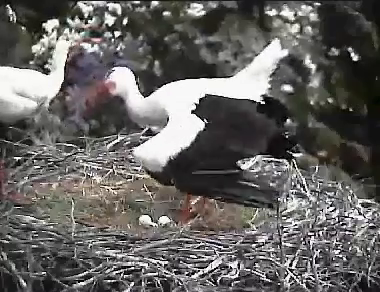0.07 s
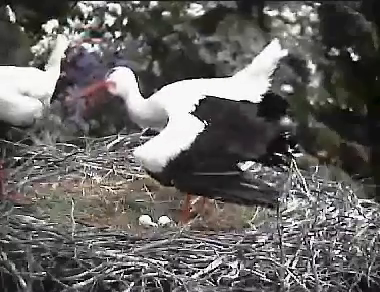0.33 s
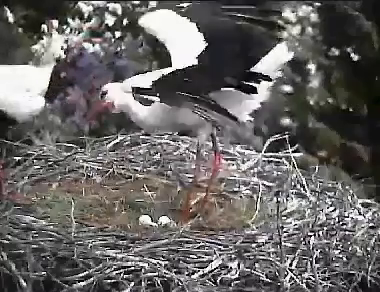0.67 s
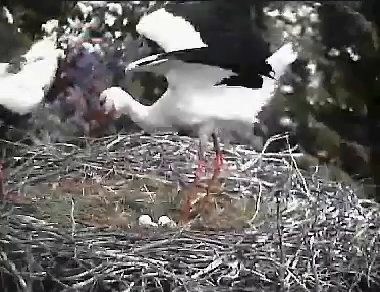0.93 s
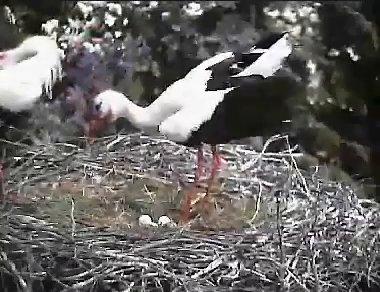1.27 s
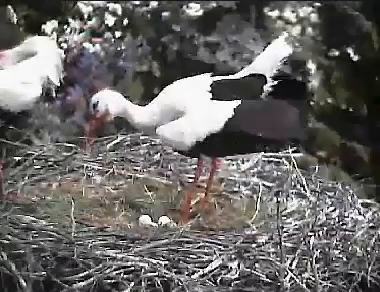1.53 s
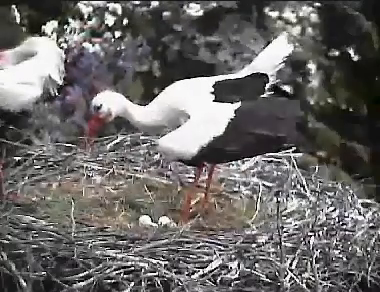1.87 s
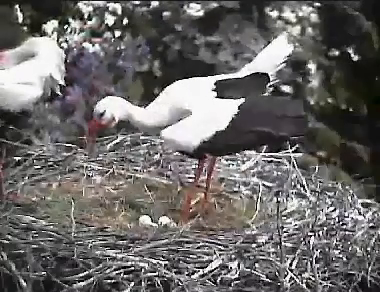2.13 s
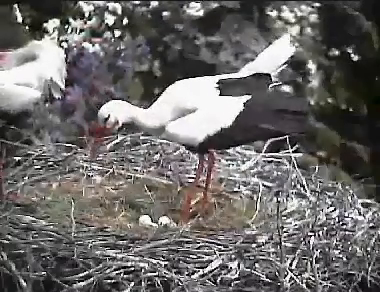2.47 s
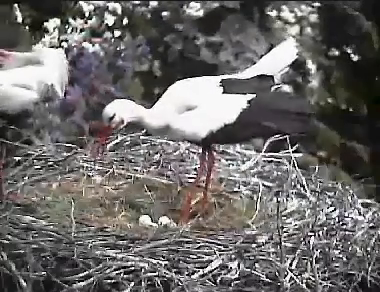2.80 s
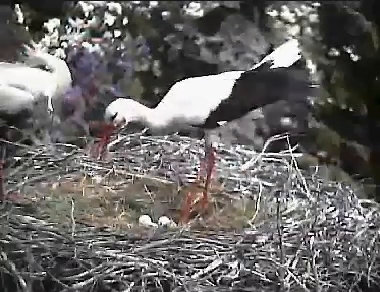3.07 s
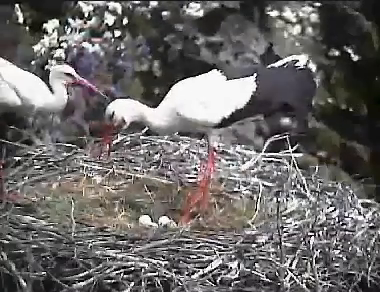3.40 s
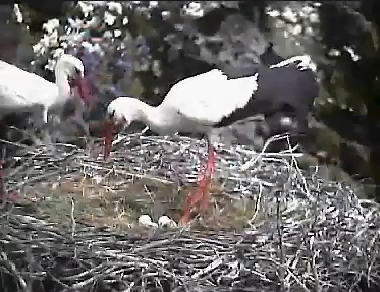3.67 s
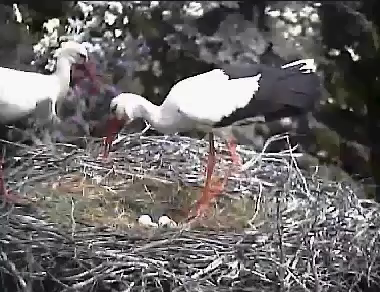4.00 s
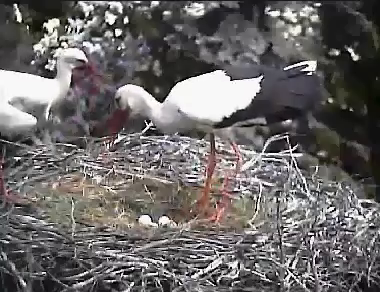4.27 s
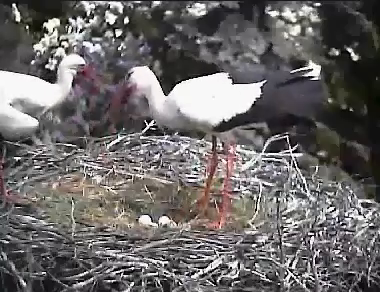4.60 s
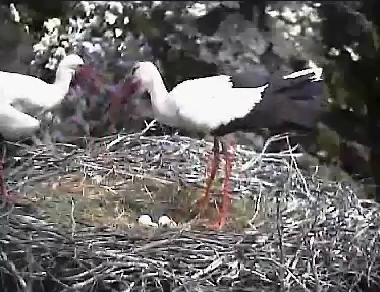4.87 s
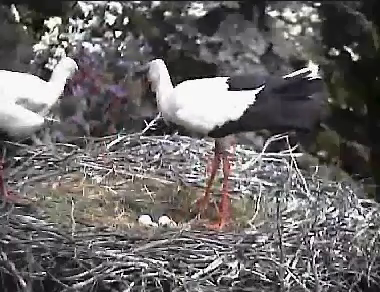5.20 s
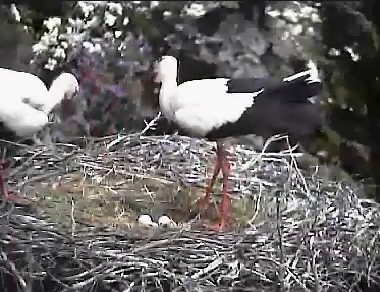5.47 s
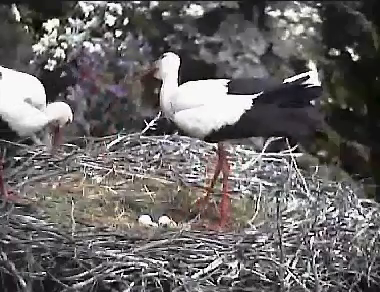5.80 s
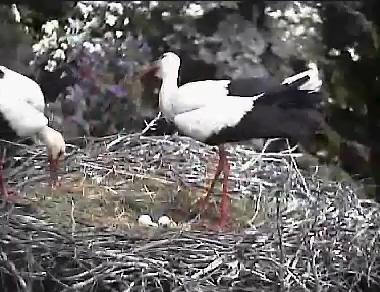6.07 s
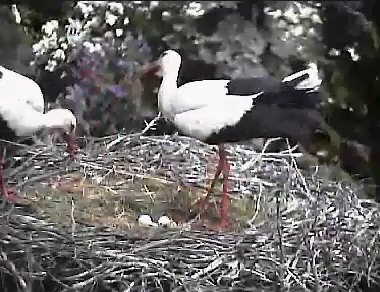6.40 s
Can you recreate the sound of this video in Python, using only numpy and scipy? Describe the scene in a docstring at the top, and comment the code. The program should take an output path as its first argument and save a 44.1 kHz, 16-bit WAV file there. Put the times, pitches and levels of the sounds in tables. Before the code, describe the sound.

Two storks clatter their bills on a twig nest in the open air. One clicks quickly and almost evenly; the other snaps more slowly, then speeds up and turns hollow and muffled before becoming brighter and slower again. Some snaps carry a short, sharp burst of noise. Near the end the clatter thins to a few separate clicks. Twigs rustle faintly, and the microphone at the nest adds a soft, steady hiss.

```python
"""Dry, rapid bill clatter: two white storks greet on their twig nest, each at its own pace.
Every snap rings the horny mandibles and the throat pouch for a few milliseconds; some snaps carry
a loud broadband noise burst. The slower bird speeds up and sounds hollow with its head thrown back.
Twigs rustle faintly, and a nest camera adds steady hiss."""
import sys
import numpy as np
from scipy import signal
from scipy.fft import rfft, irfft, next_fast_len
from scipy.io import wavfile

SR = 44100
rng = np.random.default_rng(int(sys.argv[2]) if len(sys.argv) > 2 else 0)


def store_pcm(level_fs):
    """Save levels as 16-bit WAV."""
    pcm = np.round(np.clip(level_fs, -1, 1) * 32767).astype(np.int16)
    wavfile.write(sys.argv[1], SR, np.atleast_2d(pcm).T)


N = 293265

# Faster bird, near-even beat: start_s, snap_count, force_db, overtone_re_force_db
FAST_RUNS = [(.0908, 1, -38, -8), (.2013, 1, -36.5, -7), (.3161, 2, -34.5, -1.5), (.5535, 1, -34.5, -5.5),
             (.6746, 4, -36.5, -5.5), (1.1451, 2, -36, -3.5), (1.3765, 3, -36, -4.5),
             (1.7321, 2, -38.5, -5.5), (1.9632, 3, -36.5, -4.5), (2.3213, 5, -40.5, -5),
             (2.9136, 3, -41, -5), (3.2745, 2, -40.5, -3.5), (3.5112, 2, -41, -1), (3.7448, 1, -41, -6.5),
             (3.864, 2, -39.5, -3.5), (4.1038, 3, -41, -0.5), (4.4493, 4, -38.5, 0.5),
             (4.9108, 4, -37.5, -1), (5.3745, 1, -37.5, -1.5), (5.4858, 4, -38, -1.5),
             (5.9347, 1, -41.5, -4.5), (6.0507, 1, -51, -6)]
# Slower bird, pitch drops with the head back: start_s, snap_count, force_db, mandible_hz
SLOW_RUNS = [(.0329, 1, -29, 2200), (.1743, 1, -29, 2170), (.3137, 1, -31, 2145), (.4482, 1, -30.5, 2154),
             (.5749, 1, -32, 2100), (.6848, 1, -35, 2144), (.789, 1, -32, 1870), (.8837, 1, -41, 1950),
             (.9624, 1, -40, 1890), (1.0529, 3, -35, 1620), (1.3202, 3, -33, 1610), (1.5923, 2, -32, 1580),
             (1.7785, 2, -34.5, 1670), (1.9688, 2, -34, 1650), (2.169, 3, -34, 1670), (2.477, 2, -35, 1695),
             (2.693, 2, -39, 1720), (2.9321, 1, -36, 1670), (3.0645, 1, -42, 1960), (3.2036, 1, -38, 1976),
             (3.3436, 1, -36, 2330), (3.4866, 1, -39, 2180), (3.6314, 1, -35, 2150),
             (3.7799, 2, -36.5, 2415), (4.0734, 2, -31, 2444), (4.366, 3, -31.2, 2450),
             (4.8074, 1, -31, 2380), (4.9578, 1, -30.5, 2347), (5.112, 2, -34.5, 2360),
             (5.4126, 1, -40, 2330), (6.1897, 1, -64, 1720), (6.3324, 2, -34, 2210), (6.6355, 1, -30, 2227)]
# Upper bill modes: ratio_to_mandible, level_db, decay_s
FAST_BILL_MODES = [(1.25, 1.2, 0.00075), (1.67, 0.5, 0.00042), (1.96, -5.5, 0.00027), (2.33, -11, 0.0013),
                   (3.2, -21.5, 0.00035)]
SLOW_BILL_MODES = [(1.428, 6, 0.00061), (1.743, -5, .0009), (2.05, -11, 0.00052), (2.532, -12, 0.0012),
                   (3.15, -14.5, 0.0014), (3.5, -24.5, 0.0022)]
# Snaps with a loud broadband noise burst: time_s, burst_db
NOISY_SNAPS = [(.435, -40.5), (.575, -54), (.79, -41), (.884, -50.5), (.909, -42), (1.027, -47.5),
               (1.145, -54), (2.44, -48.5), (2.913, -47), (3.344, -48.5), (3.487, -44), (3.511, -48.5),
               (3.927, -41), (4.366, -48.5), (4.66, -45), (4.795, -44), (4.958, -56.5), (5.112, -40),
               (5.263, -47.5), (5.413, -44.5), (5.485, -44.5), (5.599, -48.5), (6.483, -39)]
# Twigs shifting: centre_s, width_s, level_db
RUSTLES = [(0.169, 0.012, -59), (4.503, 0.012, -48), (5.614, 0.02, -70), (5.95, 0.047, -65),
           (6.629, 0.021, -60.5)]
# Noise spectra (broadband burst, rubbing horn or twigs, hiss): freq_hz, relative_db
BURST_SPECTRUM = [(20, -0.5), (100, -0.5), (300, 4.5), (1000, 7), (3000, 1), (6000, 3), (10000, -3.5)]
RUB_SPECTRUM = [(100, -47), (400, -14), (800, -6.5), (1250, -9), (1700, 0), (2500, 8), (4200, -8),
                (5500, -9), (10000, -25)]
HISS_SPECTRUM = [(20, 2), (60, 0.5), (180, 0), (400, 1), (800, 1), (1400, -0.5), (3500, -3), (5500, -4.5),
                 (8000, -6), (10000, -12)]

LEAD_SAMPLES = 256
SNAP_T_S = np.arange(-LEAD_SAMPLES, 4 * LEAD_SAMPLES) / SR  # 0 = impact
HEAD_FORWARD_HZ, HEAD_BACK_HZ = 2170, 1676  # slower bird's mandible pitch
VALLEY_GONE_HZ, VALLEY_FADE_HZ = 2450, 290  # mandible valley fills in as pitch rises
USUAL_FORCE_DB, SCATTER_DB = -37.5, 1.5


def clatter(snaps, modes, pouch_decay_s, pouch_lead_s, pouch_valley_ratio, mandible_decay_s,
            cavity_hz, cavity_db, rasp_db, mandible_valley_ratio=1, valley_depth=0):
    """One bird's snaps: pouch air is pushed, then the mandibles meet, ring and rasp horn on horn."""
    track = np.zeros(N)
    for time_s, pouch_hz, pouch_db, mandible_hz, mandible_db, overtone_db, burst_db in snaps:
        pouch = amp(pouch_db) * ring(pouch_hz, pouch_decay_s, 1.145, pouch_lead_s)
        softness = np.clip((2300 / mandible_hz) ** 2.87, .5, 4)  # low snaps swell more gently
        lead_s = 0.00042 * (softness - 1)
        mandible = amp(mandible_db) * ring(mandible_hz, mandible_decay_s, softness, lead_s)
        overtones = bill_overtones(modes, mandible_hz, cavity_hz, cavity_db)
        burst = amp(burst_db) * noise_burst(BURST_SPECTRUM, peak_s=0.00044, rise_s=0.0014, fall_s=0.0046)
        rasp = amp(rasp_db) * noise_burst(RUB_SPECTRUM, peak_s=0.0012, rise_s=0.0019, fall_s=0.0019)
        snap = pouch - mandible + amp(overtone_db) * (overtones + rasp) + burst
        snap = valley(snap, pouch_valley_ratio * pouch_hz, depth=0.69)
        depth = valley_depth * np.clip((VALLEY_GONE_HZ - mandible_hz) / VALLEY_FADE_HZ, 0, 1)
        snap = valley(snap, mandible_valley_ratio * mandible_hz, depth)
        start = max(round(time_s * SR) - LEAD_SAMPLES, 0)
        track[start:start + len(snap)] += snap[:N - start]
    return track


def fast_snaps(pouch_hz, pouch_db, pouch_db_per_db, mandible_hz, hz_per_db, mandible_db, burst_db):
    """Harder snaps ring higher; the mandibles gain more than the pouch."""
    for time_s, force_db, overtone_db in beats(FAST_RUNS):
        push_db = force_db - USUAL_FORCE_DB
        yield (time_s, pouch_hz, pouch_db + pouch_db_per_db * push_db,
               mandible_hz + hz_per_db * push_db, force_db + mandible_db,
               force_db + overtone_db, burst_level_db(time_s, force_db + burst_db))


def slow_snaps(pouch_hz, pouch_back_hz, pouch_db, pouch_db_per_db,
               overtone_db, muffle_db, overtone_muffle_db, burst_db):
    """Head thrown back: mandibles and overtones are muffled, the hollow pouch remains."""
    for time_s, force_db, mandible_hz in beats(SLOW_RUNS):
        head_back = np.clip((HEAD_FORWARD_HZ - mandible_hz) / (HEAD_FORWARD_HZ - HEAD_BACK_HZ), 0, 1)
        push_db = force_db - USUAL_FORCE_DB
        pouch_now_hz = pouch_hz + (pouch_back_hz - pouch_hz) * head_back
        mandible_db = force_db + muffle_db * head_back
        upper_db = mandible_db + overtone_db + overtone_muffle_db * head_back ** 2
        yield (time_s, pouch_now_hz, pouch_db + pouch_db_per_db * push_db,
               mandible_hz, mandible_db, upper_db, burst_level_db(time_s, force_db + burst_db))


def beats(runs):
    """One row per snap; time, force and timbre glide evenly from run to run."""
    start_s, count, force_db, timbre = np.transpose(runs)
    count = np.maximum(np.round(count), 1)
    first = np.cumsum(count) - count
    index = np.arange(count.sum())
    return zip(*(np.interp(index, first, column) for column in (start_s, force_db, timbre)))


def ring(pitch_hz, decay_s, softness=1, lead_s=0):
    """Heavily damped mode; swells as the mandibles close along their length."""
    t = np.maximum(SNAP_T_S + lead_s, 0)
    envelope = (t / decay_s) ** softness * np.exp(-t / decay_s)
    return norm_energy(envelope * np.sin(2 * np.pi * pitch_hz * t))


def bill_overtones(modes, mandible_hz, cavity_hz, cavity_db):
    """Upper modes vary from snap to snap; the bill cavity weights one band."""
    overtones = np.zeros(len(SNAP_T_S))
    for k, (ratio, level_db, decay_s) in enumerate(modes):
        pitch_hz = ratio * mandible_hz * (1 + 0.0088 * rng.standard_normal())
        band_db = cavity_db * np.exp(-((pitch_hz - cavity_hz) / 500) ** 2)
        gain = amp(level_db + band_db + SCATTER_DB * rng.standard_normal())
        overtones += (-1) ** k * gain * ring(pitch_hz, decay_s)
    return norm_energy(overtones)


def noise_burst(spectrum, peak_s, rise_s, fall_s):
    """Short noise burst around each snap, with exponential rise and fall."""
    envelope = np.exp(np.minimum((SNAP_T_S - peak_s) / rise_s, (peak_s - SNAP_T_S) / fall_s))
    return norm_energy(noise(spectrum, len(SNAP_T_S)) * envelope)


def burst_level_db(time_s, usual_db):
    """Loud burst on the noisy snaps, faint on all others."""
    return next((db for noisy_s, db in NOISY_SNAPS if abs(time_s - noisy_s) < .008), usual_db)


def valley(x, centre_hz, depth):
    """Broad antiresonance between two modes; depth 0-1."""
    notched = signal.lfilter(*signal.iirnotch(centre_hz, Q=5.5, fs=SR), x)
    return x + depth * (notched - x)


def tree_echo(x, t60_s, wet_db):
    """Open air: a very faint tail from the trees."""
    t = np.arange(SR // 3) / SR
    tail = rng.standard_normal(len(t)) * amp(-60 * t / t60_s)
    return signal.fftconvolve(x, amp(wet_db) * tail / np.linalg.norm(tail))[:N]


def twig_rustle():
    """Twigs rub together in short swells."""
    t = np.arange(N) / SR
    envelope = sum(amp(level_db) * np.exp(-2 * ((t - centre_s) / width_s) ** 2)
                   for centre_s, width_s, level_db in RUSTLES)
    return envelope * noise(RUB_SPECTRUM, N)


def noise(spectrum, size):
    """Shaped noise, rms 1."""
    freq_hz, relative_db = np.transpose(spectrum)
    bin_hz = np.fft.rfftfreq(size, 1 / SR)
    gain = amp(np.interp(np.log(bin_hz + 1), np.log(freq_hz), relative_db))
    x = irfft(rfft(rng.standard_normal(size)) * gain, size)
    return x / np.sqrt(np.mean(x ** 2) + 1e-20)


def norm_energy(x):
    """Scale to the energy of 4 ms at rms 1."""
    return x / np.sqrt(np.sum(x ** 2) / (.004 * SR) + 1e-20)


def amp(db):
    """dB to gain."""
    return 10 ** (np.asarray(db) / 20)


def scene():
    """Both birds and the nest in open air."""
    snaps = fast_snaps(pouch_hz=706, pouch_db=-46.0, pouch_db_per_db=0.58,
                       mandible_hz=2003, hz_per_db=11.5, mandible_db=-0.5, burst_db=-17)
    fast = clatter(snaps, FAST_BILL_MODES,
                   pouch_decay_s=0.0012, pouch_lead_s=0.00042, pouch_valley_ratio=1.385,
                   mandible_decay_s=0.00038, cavity_hz=4630, cavity_db=-1.0, rasp_db=-3)
    snaps = slow_snaps(pouch_hz=837, pouch_back_hz=852, pouch_db=-46.5, pouch_db_per_db=0.55,
                       overtone_db=-4.0, muffle_db=-11.5, overtone_muffle_db=-10.5, burst_db=-24)
    slow = clatter(snaps, SLOW_BILL_MODES,
                   pouch_decay_s=0.0012, pouch_lead_s=0.00077, pouch_valley_ratio=1.437,
                   mandible_decay_s=0.00052, mandible_valley_ratio=1.177, valley_depth=0.61,
                   cavity_hz=5110, cavity_db=12.5, rasp_db=-2)
    birds = fast + slow
    return (birds + tree_echo(birds, t60_s=0.12, wet_db=-26.5) + twig_rustle())[None]


def record(dry):
    """Nest camera: steady hiss, steep band limit."""
    hiss_db, cutoff_hz = -67, 10200
    sound = dry + amp(hiss_db) * noise(HISS_SPECTRUM, N)
    size = next_fast_len(N + SR // 4)
    lowpass = 1 / (1 + (np.fft.rfftfreq(size, 1 / SR) / cutoff_hz) ** 120)
    return irfft(rfft(sound, size) * lowpass, size)[:, :N]


dry = scene()
out = record(dry)
store_pcm(out)
```